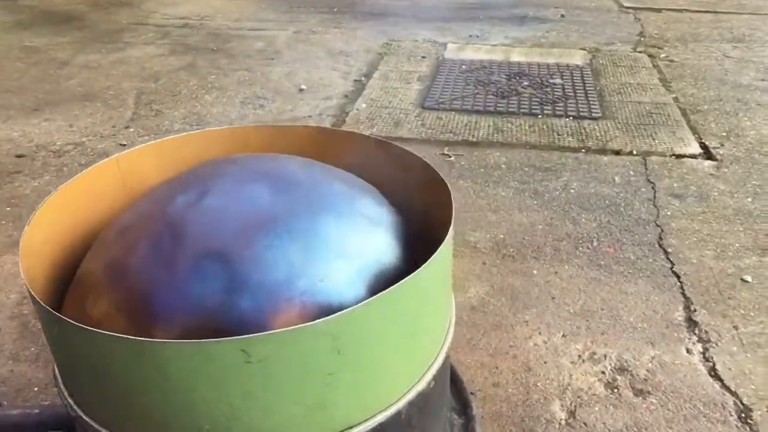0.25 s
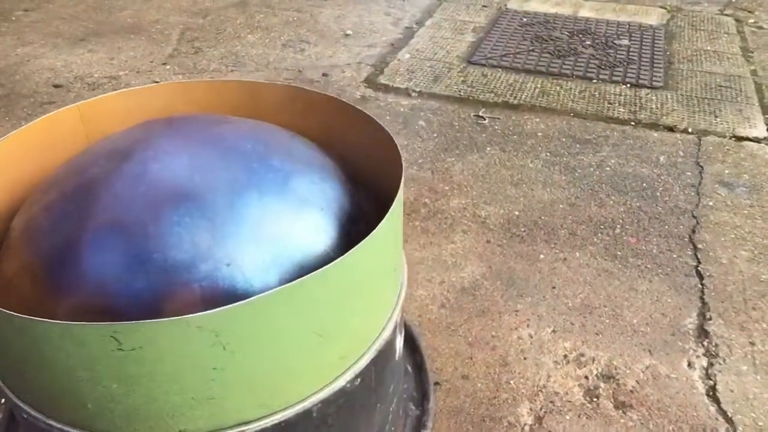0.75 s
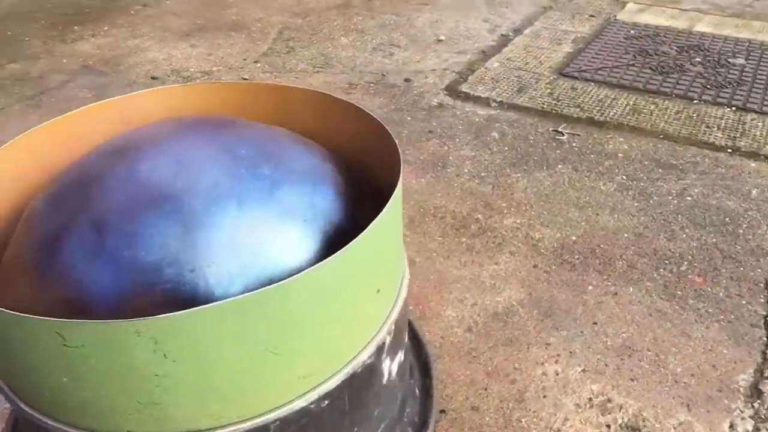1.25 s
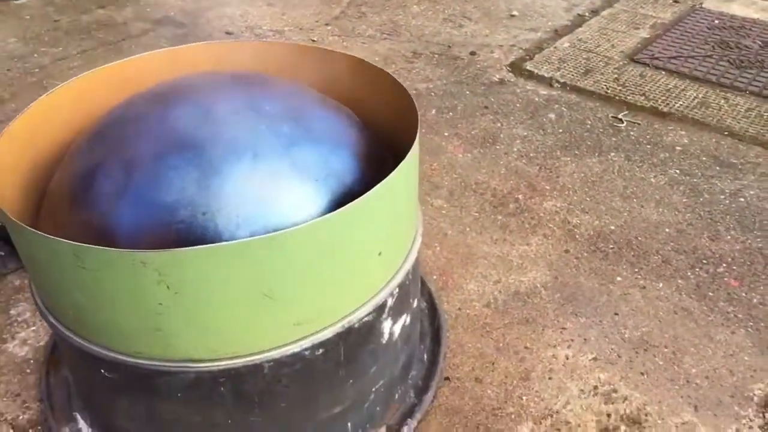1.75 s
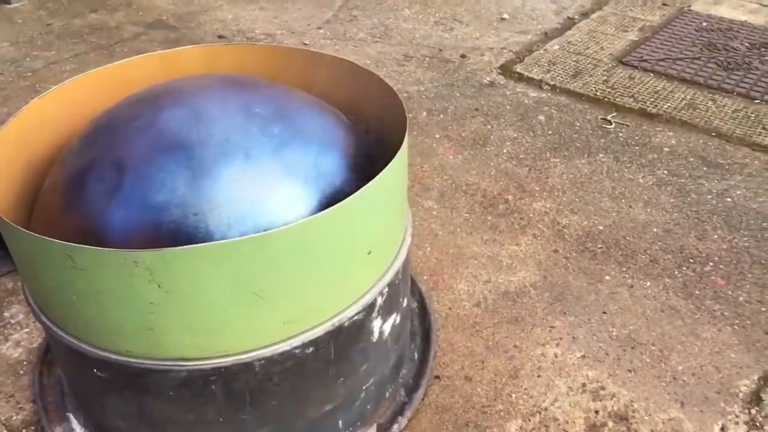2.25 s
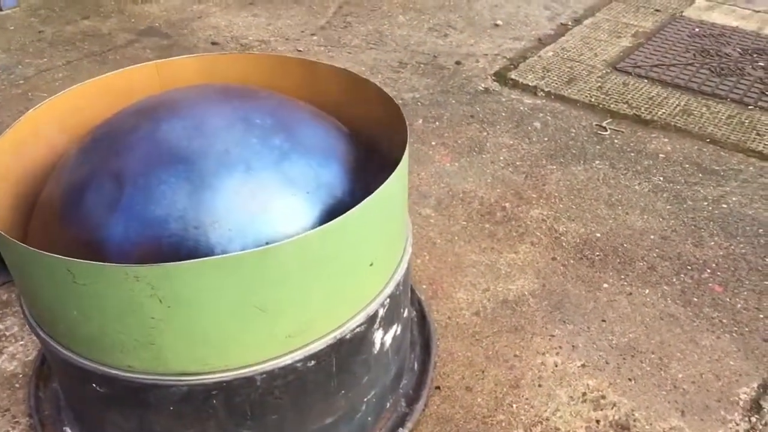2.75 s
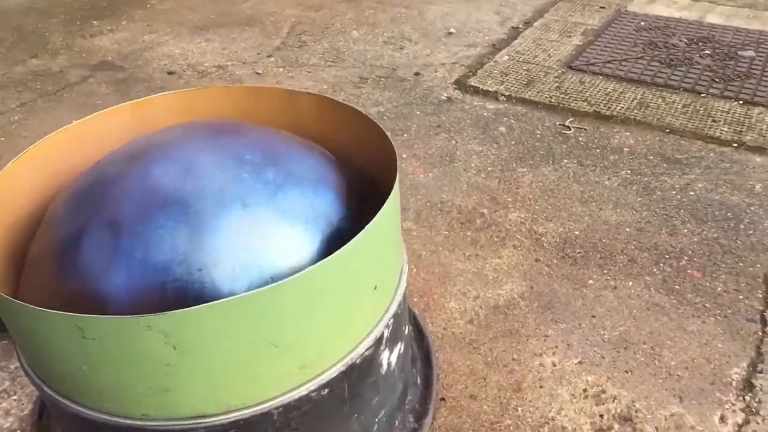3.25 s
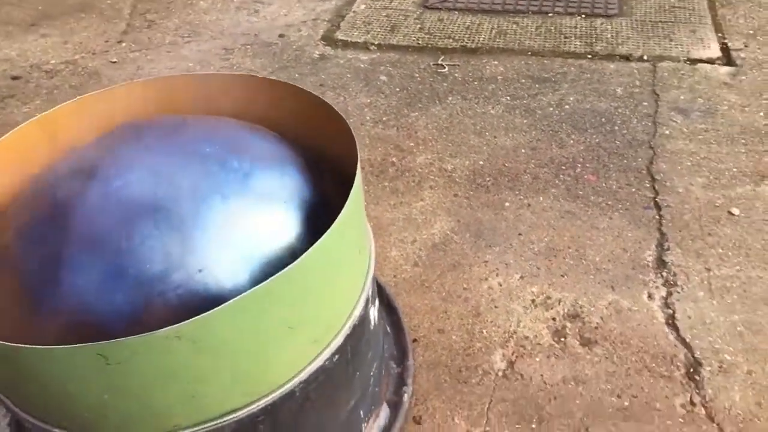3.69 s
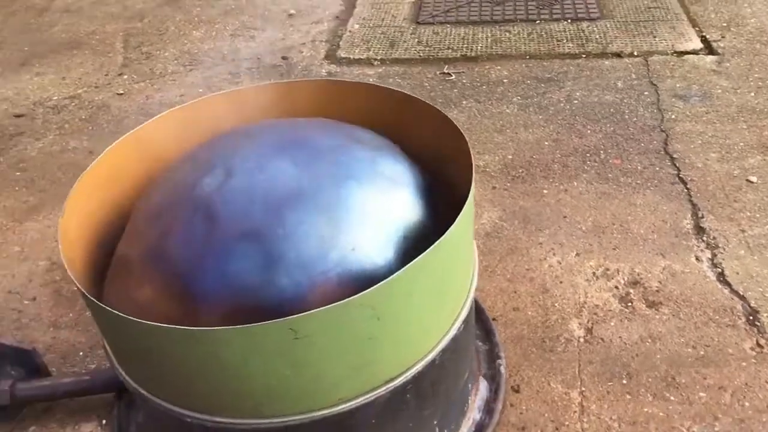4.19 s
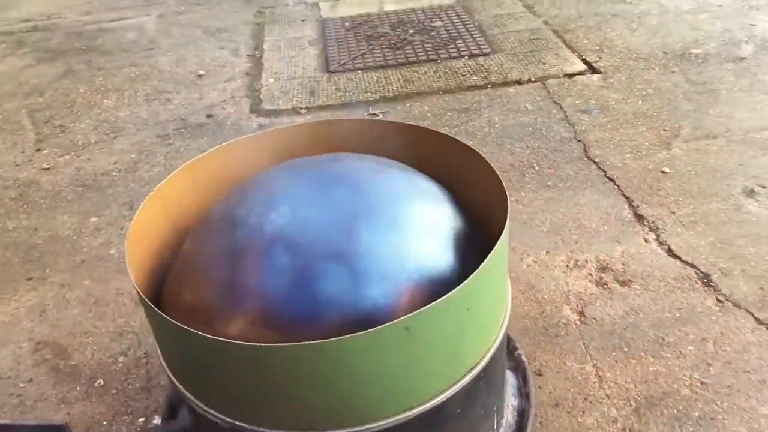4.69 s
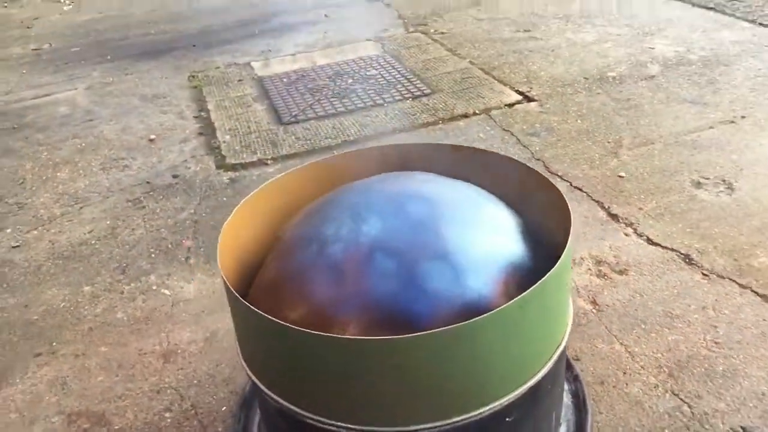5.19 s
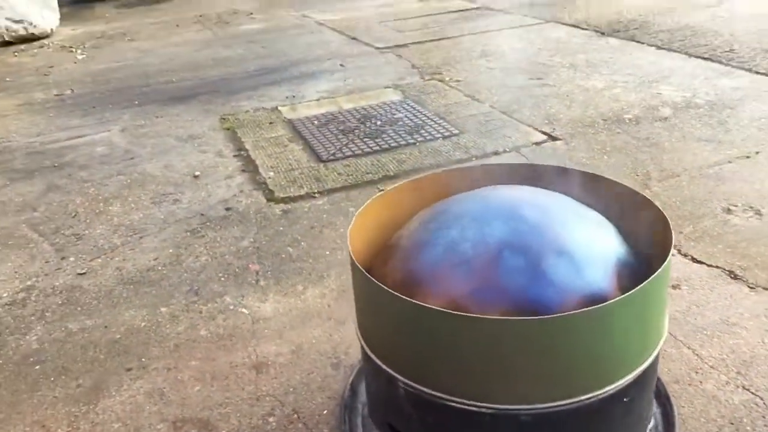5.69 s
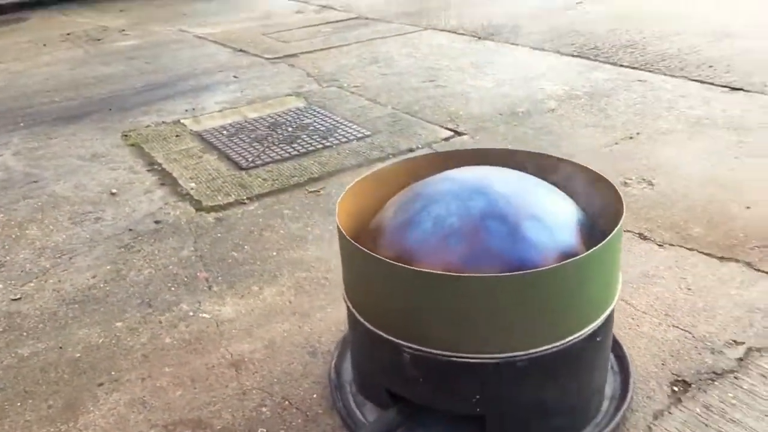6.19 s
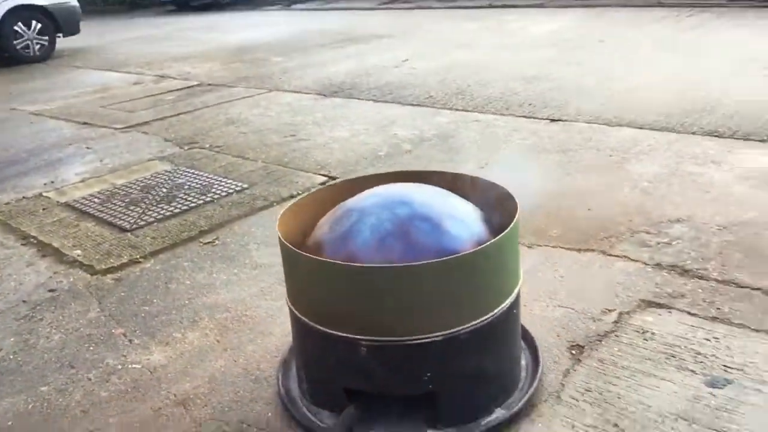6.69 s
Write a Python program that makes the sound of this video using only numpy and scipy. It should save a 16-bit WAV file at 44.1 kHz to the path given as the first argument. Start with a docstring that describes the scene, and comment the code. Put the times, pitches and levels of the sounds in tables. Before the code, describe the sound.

A propane torch burns into a steel drum under a metal dome in an outdoor yard for about seven seconds. A deep, unevenly fluttering flame rumble dominates, with a softer gas hiss and a faint hollow ring from the burner tube. A gust gives a low thud right at the start. Draughts briefly sink the flame around 0.3 and 0.7 seconds, lifting the ring slightly. A faint falling swish passes at 1.1 seconds. From about 1 to 4 seconds the drum screens the hiss. Near 3 seconds the jet spurts with short airy whistles, the flame dips, air rushes through and a fainter swish falls. After 4 seconds the microphone moves around toward the burner and the hiss grows brighter, clearest from 5.3 seconds as the ring fades. Soft thuds come at 4.8 and 6.9 seconds, and brief breathy inlet whistles at 5.7, 6.3 and 6.7.

```python
"""Concrete yard, outdoors: a propane torch fires into a steel drum under a hot metal dome.
The flame rumbles unevenly in the drum; the gas jet hisses and rings the burner's mixing tube.
Draughts thin the mixture: the flame sinks, the tube's ring rises, more air rushes through the drum.
Gusts thud on the flame, the air inlet whistles briefly, two faint swishes fall in pitch.
The microphone moves round the drum, so the jet is first screened by it, later heard directly."""
import sys
import numpy as np
from scipy import signal
from scipy.fft import rfft, irfft
from scipy.io import wavfile
from scipy.ndimage import uniform_filter1d, map_coordinates

SR = 44100
rng = np.random.default_rng(int(sys.argv[2]) if len(sys.argv) > 2 else 0)


def master(y):
    """Save y as 16-bit WAV."""
    cut = np.clip(np.atleast_2d(y).T, -1, 1)
    pcm = np.round(cut * 32767)  # scale
    wavfile.write(sys.argv[1], SR, pcm.astype(np.int16))


N = 306054
TIME = np.arange(N) / SR
FREQS = np.maximum(np.fft.rfftfreq(N, 1 / SR), 1)

# microphone path: t/s, bearing (0 behind the drum, 1.2 beside the air inlet, 2.5 facing it, 3 past it)
MIC_BEARING = [(0, 0.82), (.8, 0.51), (1.2, 0.027), (4.06, 0.04), (4.28, 1.23), (5.19, 1.27), (5.28, 2.1),
               (5.7, 2.64), (6.2, 2.55), (6.45, 2.91), (6.94, 2.77)]
# five sides of the burner (screened, grazing, beside, facing, past): bearing
SIDE_BEARINGS = [0, 0.6, 1.2, 2.5, 3]
# jet hiss envelope: t/s, level/dB
HISS_ENVELOPE = [(0.0, -34), (0.08, -41.5), (0.2, -41.5), (0.3, -36.5), (0.56, -41), (0.72, -33.5),
                 (0.82, -37.5), (0.91, -42.5), (1.1, -42.5), (1.3, -45), (1.85, -44.5), (2.75, -41.5),
                 (3.5, -42), (3.65, -45), (4.06, -44.5), (4.17, -38.5), (4.42, -35.5), (4.95, -39),
                 (5.21, -37.5), (5.25, -35), (5.6, -34.5), (5.9, -33), (6.35, -34.5), (6.94, -37)]
# mixing tube envelope: t/s, level/dB
TUBE_ENVELOPE = [(0.0, -43.5), (0.7, -43), (0.95, -44), (1.65, -43.5), (1.9, -46), (2.25, -42),
                 (3.45, -43.5), (3.72, -46), (4.1, -43.5), (4.24, -42.5), (4.42, -47.5), (4.56, -40.5),
                 (4.88, -43), (5.1, -44), (5.48, -50), (5.85, -48.5), (6.94, -53.5)]
# draughts: t/s, strength (0-1), half length/s
DRAUGHT_SWELLS = [(.29, 0.9, 0.037), (.655, 0.72, 0.19), (2.25, 0.33, 0.1), (3.05, 1, 0.15),
                  (3.45, 0.8, 0.05)]


def from_db(db):
    """Decibels to gain."""
    return 10 ** (np.asarray(db) / 20)


def rms_one(x):
    """Scale to unit power."""
    return x / np.sqrt(np.mean(x ** 2) + 1e-20)


def in_time(rows):
    """Per-sample curve from rows of t/s, value."""
    return np.interp(TIME, *np.transpose(rows))


def swells(rows):
    """Sum of bell curves from rows of t/s, height, half length/s."""
    return sum(height * np.exp(-((TIME - t_s) / half_s) ** 2) for t_s, height, half_s in rows)


def noise(gain):
    """Turbulence with the given gain per frequency; rms 1."""
    return rms_one(irfft(rfft(rng.standard_normal(N)) * gain, N))


def colour(points):
    """Gain per frequency from rows of f/Hz, level/dB."""
    hz, db = np.transpose(points)
    return from_db(np.interp(np.log(FREQS), np.log(hz), db))


def resonances(modes):
    """Gain per frequency of steep-skirted modes from rows of f/Hz, width/Hz, level/dB."""
    peaks = (from_db(db) / (1 + ((FREQS - hz) / (0.72 * width_hz)) ** 2) for hz, width_hz, db in modes)
    return np.sqrt(sum(peak ** 2 for peak in peaks))


def flutter(rate_hz, depth_db):
    """Random gain wandering at about the given rate."""
    return from_db(depth_db * noise(1 / (1 + (FREQS / rate_hz) ** 2)))


def steadied(x, window_s):
    """Even out the power over the window."""
    size = int(window_s * SR)
    power = uniform_filter1d(uniform_filter1d(x ** 2, size), size)
    return x / np.sqrt(power + 1e-12)


def flame(deep_hz=165, roar_hz=220, trim_db=-0.77, usual_db=-28, draught_db=-6, brief_half_s=0.014):
    """Combustion noise held low by the drum; as the flame sinks, its deep part sinks less than its core."""
    envelope = [(0.0, -28), (0.22, -24.5), (0.55, -27), (0.9, -29.5), (1.2, -27), (1.45, -24), (2.1, -28),
                (2.85, -29), (3.3, -28), (3.55, -28), (4.1, -25), (4.95, -26), (5.55, -29.5), (5.72, -27),
                (5.92, -32.5), (6.22, -27.5), (6.45, -29), (6.94, -29)]  # slow swell: t/s, level/dB
    roar_balance = [(0.05, 0), (0.25, -2.5), (0.4, 3.5), (0.88, 3), (1.1, 0.5), (1.65, -6.5), (2.1, -0.5),
                    (2.5, 5.5), (2.78, -1), (3.05, 10), (3.3, -1), (3.9, 2), (4.3, -3), (5.05, 2.5),
                    (5.6, 4), (5.9, 0.5), (6.25, 3), (6.94, 3)]  # upper roar against core: t/s, level/dB
    spectrum = [(22, -40), (30, -31), (40, -27), (60, -10.5), (90, -7), (120, -2.5), (158, -0.7),
                (194, 1.5), (226, -7.5), (258, -12.5), (288, -13), (325, -22), (410, -37.5), (700, -50.5)]  # combustion noise: f/Hz, level/dB
    # brief swells (+) and dips (-) in the rumble's loudness: t/s, level/dB
    swells_and_dips = [(0.055, 8.5), (0.13, 4), (.237, 6.5), (.499, 7), (.693, -16), (1.027, 7),
                       (1.302, -10), (1.89, -6), (1.987, 6), (2.115, 5), (2.761, 1), (2.796, -18),
                       (2.835, 3), (2.905, -8), (2.974, 6.5), (3.273, 5), (3.541, 3.5), (4.033, 6),
                       (4.06, -6), (4.172, 1), (4.217, -7), (4.53, 6), (4.728, -8), (4.841, 3),
                       (4.909, 3.5), (4.939, -6), (5.045, -8), (5.116, 3.5), (5.363, -2), (5.394, 6.5),
                       (5.682, 3.5), (5.75, 2), (6.173, 5), (6.251, 2.5)]
    rumble_db = in_time(envelope) + draught_db * swells(DRAUGHT_SWELLS)
    rumble = noise(colour(spectrum))
    deep = irfft(rfft(rumble) / (1 + (FREQS / deep_hz) ** 10), N)
    roar = irfft(rfft(rumble) / (1 + (roar_hz / FREQS) ** 10), N)
    deep_gain = from_db(0.99 * (usual_db - rumble_db))
    roar_gain = from_db(in_time(roar_balance))
    burning = rumble + (deep_gain - 1) * deep + (roar_gain - 1) * roar
    brief_db = swells([(t_s, db, brief_half_s) for t_s, db in swells_and_dips])
    gain = from_db(rumble_db + trim_db + brief_db) * flutter(rate_hz=22, depth_db=0.78)
    return gain * steadied(burning, window_s=0.079)


def thinned(x):
    """Sound is faster in a thinner or warmer mixture: the tube's modes rise and sag together."""
    pitch_rise = [(0, -0.5), (0.17, 0.27), (0.25, 3), (0.36, 0.25), (0.5, -0.2), (0.62, 3), (0.75, 0.5),
                  (0.87, -1), (1.3, 0.17), (1.63, -0.86), (2.0, 0.4), (2.62, 0), (2.73, 1.13), (2.93, 0.5),
                  (3.0, 3.5), (3.1, 0.87), (3.25, -1.04), (3.42, 0.7), (3.85, -0.4), (4.15, 0.53),
                  (5.0, -1), (5.15, -1.1), (6.1, -1), (6.25, 0.7), (6.42, -0.2), (6.94, -1.2)]  # mode shift: t/s, rise/%
    position = np.cumsum(1 + in_time(pitch_rise) / 100)
    return map_coordinates(x, [position], order=5, mode="wrap")


def standing_waves(spacing_hz=299.8, ripple_db=5.5, centre_hz=4950, reach_hz=540):
    """Gain per frequency: sound running up and down the tube ripples the hiss at even steps."""
    reach = 1 / (1 + ((FREQS - centre_hz) / reach_hz) ** 2)
    return from_db(ripple_db * reach * np.cos(2 * np.pi * FREQS / spacing_hz))


def tube_ring(trim_db=-11):
    """The jet rings the mixing tube; each mode is beamed its own way."""
    modes = [(1251.4, 46.4, -0.5, 3.5, 2, 6.5, 5), (1556, 54, -0.5, 0.5, 4, 8, 8.5),
             (1854, 69, -0.3, -1, 0, 6, 3), (1986, 38, -3.5, -3.5, -7, -4, 1),
             (2171, 54, -3.5, -1, 1, 2.5, 2), (2446, 29, 2, 2.5, 1.5, 3.5, 3),
             (2757, 32, -4.5, -5, -4, 0, 7.5), (3025, 42, -3.5, -1.5, -8, 3.5, 8),
             (3290, 29, -3, -3, -2, -20, -8)]  # tube modes: f/Hz, width/Hz, level/dB on each of the five sides
    bearing = in_time(MIC_BEARING)
    mean_width_hz = np.mean([mode[1] for mode in modes])
    ring = 0
    for hz, width_hz, *side_db in modes:
        gain = from_db(np.interp(bearing, SIDE_BEARINGS, side_db)) * np.sqrt(width_hz / mean_width_hz)
        ring += gain * steadied(noise(resonances([(hz, width_hz, 0)])), window_s=0.27)
    return from_db(in_time(TUBE_ENVELOPE) + trim_db) * thinned(ring) * flutter(rate_hz=53, depth_db=0.5)


def jet_hiss(trim_db=2):
    """Directional nozzle hiss: its colour changes with the microphone's bearing."""
    # hiss spectrum on each side: f/Hz, level/dB
    screened = [(1000, -30), (3000, -6), (4000, -1), (4700, -5), (5500, 0.5), (6400, 2), (7000, -1),
                (7900, -5), (8700, -3.5), (9100, 1), (10000, -2.5), (10900, 1.3), (12000, -0.5),
                (13400, -1), (14500, 1), (15300, 3.5), (15700, 1.5)]
    grazing = [(1000, -20), (3000, -8), (4100, -8), (4800, -6), (5400, 1), (6500, 1), (7650, -4), (8200, 0),
               (8700, -1), (9150, 2), (10150, -5), (10900, 2), (12200, -1), (13300, 0), (14200, 4),
               (15700, 2)]
    beside = [(1000, -9), (3900, -7), (4500, -3), (5050, -3.5), (5550, 3), (6500, 2), (7700, -7),
              (8600, -8), (8950, -0.5), (10250, -3), (10750, 1.3), (11200, 1), (12300, 3.5), (13400, -1),
              (14700, 0.5), (15400, 4), (15700, 1.5)]
    facing = [(1000, -13), (2500, -10), (2980, -5), (3130, -17), (3280, -7), (3700, -3.5), (5000, -4.5),
              (5950, 3), (7100, -4), (8600, -5), (9050, 5), (9450, -0.5), (10200, -5.5), (10850, 5),
              (11400, 3.5), (12900, -3.5), (14300, 5.5), (15150, 8.5), (15700, 0)]
    past = [(1000, -13), (2550, -12), (2750, -4), (3020, -2.5), (3130, -17), (3260, -3.5), (3700, -2),
            (4300, 0), (5000, -2), (5950, 3), (7300, -3.5), (8600, -3.5), (9100, 0), (10250, -4),
            (10900, -0.5), (11700, -2), (13800, 2), (15100, 7.5), (15700, -2)]
    bearing = in_time(MIC_BEARING)
    hiss, ripple = 0, standing_waves()
    for spectrum, selector in zip((screened, grazing, beside, facing, past), np.eye(5)):
        power_share = np.interp(bearing, SIDE_BEARINGS, selector)
        hiss += np.sqrt(power_share) * noise(colour(spectrum) * ripple)
    return from_db(in_time(HISS_ENVELOPE) + trim_db) * thinned(hiss)


def ground_echo(x, echo_db=-13, delay_s=0.0052, s_per_bearing=0.000196):
    """The concrete's reflection combs the hiss; the comb slides as the microphone moves."""
    lag_s = delay_s + s_per_bearing * in_time(MIC_BEARING)
    echo = map_coordinates(x, [(TIME - lag_s) * SR], order=3, mode="wrap")
    return (x + from_db(echo_db) * echo) / np.sqrt(1 + from_db(echo_db) ** 2)


def tube_rush(mouth_trim_db=-7.5, inlet_trim_db=-17, db_per_bearing=0.1):
    """Broad noise leaves the tube's mouth; the air inlet adds high resonances."""
    mouth_spectrum = [(800, -64), (1300, 4.5), (1900, 12.5), (2500, 13.5), (3300, 9), (4100, 11),
                      (4800, -2), (7000, -34)]  # mouth noise: f/Hz, level/dB
    inlet_modes = [(4390, 22, 10), (4700, 19, 2.5), (4830, 33, -3), (5390, 67, 8), (6500, 83, 2)]  # inlet resonances: f/Hz, width/Hz, level/dB
    mouth_db = in_time(TUBE_ENVELOPE) + mouth_trim_db + db_per_bearing * in_time(MIC_BEARING)
    inlet_db = in_time(HISS_ENVELOPE) + inlet_trim_db
    mouth = thinned(noise(colour(mouth_spectrum) * standing_waves()))
    inlet = thinned(noise(resonances(inlet_modes)))
    return from_db(mouth_db) * mouth + from_db(inlet_db) * inlet


def drum(base_db=-56, db_per_bearing=2.5, draught_db=5):
    """Hot gas rushes past the dome and rings the drum, louder in a draught and towards the inlet."""
    modes = [(556, 30, -0.5), (731.5, 59, -1), (861, 26, -0.5), (961, 45, 3.5)]  # drum and collar modes: f/Hz, width/Hz, level/dB
    rush_spectrum = [(250, 5), (400, 2.5), (620, -3), (900, 0), (1100, 2), (1500, -1), (3000, -31)]  # gas rush: f/Hz, level/dB
    level_db = base_db + db_per_bearing * in_time(MIC_BEARING) + draught_db * swells(DRAUGHT_SWELLS)
    ring = noise(resonances(modes))
    rush = noise(colour(rush_spectrum))
    return from_db(level_db) * (ring + rush) * flutter(rate_hz=33, depth_db=0.27)


def wandering(x, depth_db, width_hz, span_s, smooth_above_hz=10500):
    """Reflections add and cancel at the moving microphone: random spectral patches swell and fade."""
    hz, t_s, cells = signal.stft(x, SR, nperseg=1024)
    patches = rng.standard_normal(cells.shape)
    for _ in range(2):
        patches = uniform_filter1d(patches, max(int(width_hz / hz[1]), 1), axis=0, mode="wrap")
        patches = uniform_filter1d(patches, max(int(span_s / t_s[1]), 1), axis=1, mode="wrap")
    reach = 1 / (1 + (hz[:, None] / smooth_above_hz) ** 4)
    return signal.istft(cells * from_db(depth_db * reach * rms_one(patches)), SR)[1][:N]


def sizzling(x, spurt_db, low_share=0.79, top_share=0.72):
    """Eddies of each size flutter apart, band by band; the top band follows a spurt least."""
    centres_hz = [3000, 6000, 9000, 11500, 15000]  # band centres: f/Hz
    spectrum, sizzle = rfft(x), 0
    shares = np.linspace(low_share, top_share, len(centres_hz))
    for share, selector in zip(shares, np.eye(len(centres_hz))):
        band = irfft(spectrum * np.interp(FREQS, centres_hz, selector), N)
        sizzle += band * from_db(share * spurt_db) * flutter(rate_hz=24, depth_db=1.32)
    return sizzle


def gust_thuds(centre_hz=64, width_hz=30, lowpass_hz=120):
    """Gusts push the flame aside with a deep thud."""
    gusts = [(0.13, -31, 0.033), (4.766, -41, .03), (6.85, -33, 0.031)]  # t/s, peak level/dB, half length/s
    envelope = swells([(t_s, from_db(db), half_s) for t_s, db, half_s in gusts])
    thud = noise(resonances([(centre_hz, width_hz, 0)]) / (1 + (FREQS / lowpass_hz) ** 4))
    return envelope * steadied(thud, window_s=0.091)


def inlet_whistles(width_hz=800):
    """Airy whistles: a band of the inlet hiss swells briefly."""
    whistles = [(0.605, 4320, -50.5, 0.045), (2.715, 3920, -45.5, 0.027), (2.977, 2520, -47, 0.015),
                (2.98, 3770, -49, 0.013), (5.7, 3800, -48, 0.064), (6.344, 4775, -44, 0.054),
                (6.714, 4280, -41, 0.088)]  # t/s, f/Hz, peak level/dB, half length/s
    out = 0
    for t_s, hz, db, half_s in whistles:
        band = noise(resonances([(hz, width_hz, 0)]) * standing_waves())
        out += swells([(t_s, from_db(db), half_s)]) * band
    return out


def swishes(half_width_hz=200):
    """A noise band slides down in pitch as it swells and fades."""
    sweeps = [(1.128, 0.088, 900, 300, -43), (3.02, 0.04, 1000, 550, -51)]  # t/s, length/s, start f/Hz, end f/Hz, peak level/dB
    out, band = 0, noise(1 / (1 + (FREQS / half_width_hz) ** 4))
    for t_s, length_s, start_hz, end_hz, db in sweeps:
        progress = np.clip((TIME - t_s) / length_s, 0, 1)
        phase = 2 * np.pi * np.cumsum(start_hz * (end_hz / start_hz) ** progress) / SR
        out += from_db(db) * np.sin(np.pi * progress) * band * np.sqrt(2) * np.cos(phase)
    return out


def scene():
    """Ring, hiss and drum follow the gas flow's flutter and spurts; one microphone feeds both channels."""
    spurts = [(.217, 4, 0.017), (.615, 2, 0.05), (2.882, -1, 0.0077), (2.975, 7, 0.03), (3.5, 2, 0.025),
              (5.076, 3.5, 0.025), (5.195, -2, 0.031), (5.296, 3.5, 0.025), (5.45, -3.5, 0.036),
              (5.533, 1, 0.02), (5.6, -2, 0.023), (6.41, -4, 0.026), (6.49, 1.5, 0.02),
              (6.828, -2.5, 0.034)]  # jet spurts (+) or falters (-): t/s, ring level/dB, half length/s
    spurt_db = swells(spurts)
    ring = wandering(tube_ring(), depth_db=1.72, width_hz=210, span_s=0.22)
    hiss = wandering(ground_echo(jet_hiss()) + tube_rush(), depth_db=2.5, width_hz=240, span_s=0.1)
    gas = ring * from_db(spurt_db) + sizzling(hiss + inlet_whistles() + drum(), spurt_db)
    mix = flame() + gust_thuds() + gas * flutter(rate_hz=11, depth_db=0.59) + swishes()
    return np.tile(mix, (2, 1))


def record(dry, low_cut_hz=37, high_cut_hz=15700):
    """The microphone drops the deepest bass; the top is cut steeply."""
    heard = signal.sosfilt(signal.butter(6, low_cut_hz, "high", fs=SR, output="sos"), dry)
    return signal.sosfilt(signal.ellip(12, 0.1, 90, high_cut_hz, fs=SR, output="sos"), heard)


dry = scene()
out = record(dry)
master(out)
```